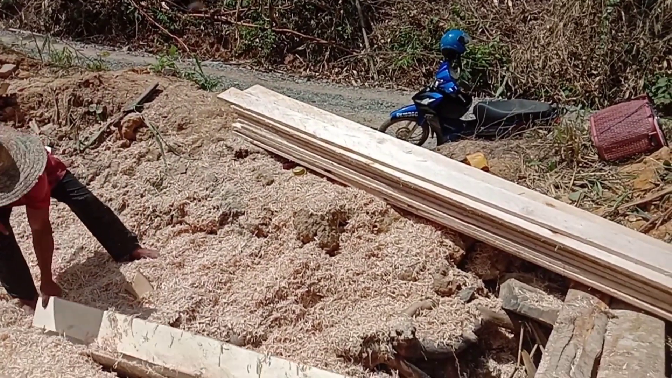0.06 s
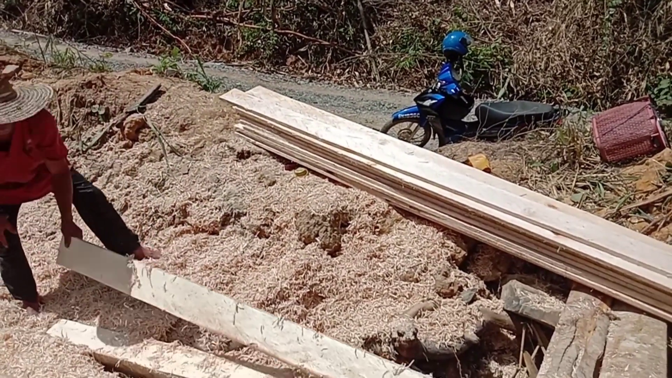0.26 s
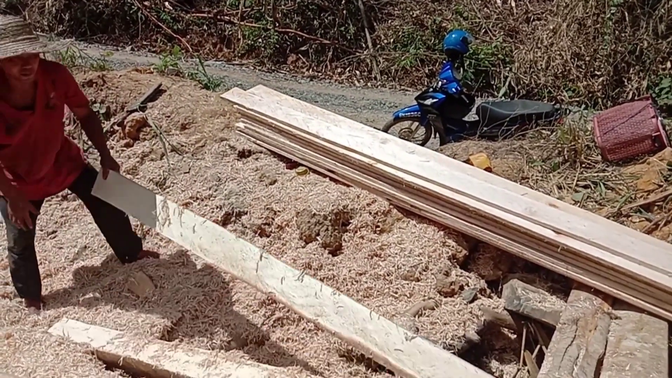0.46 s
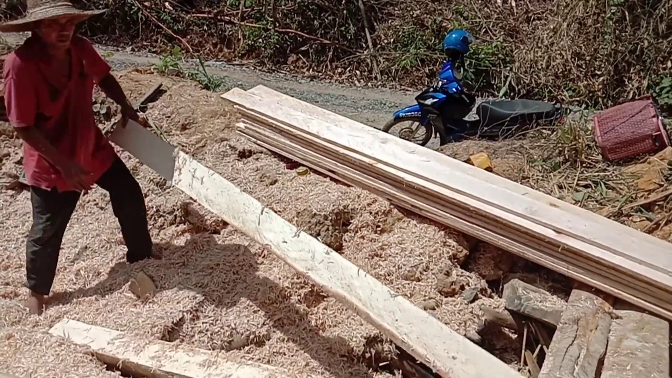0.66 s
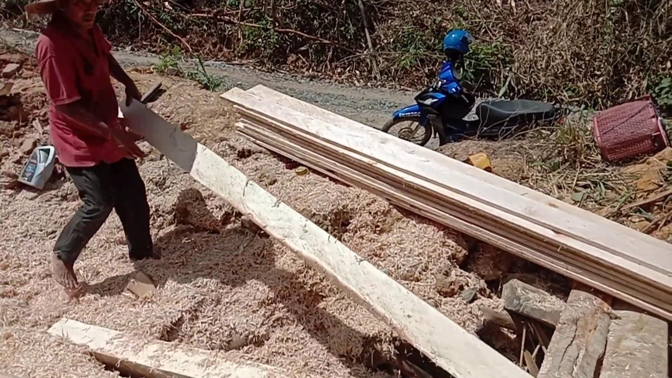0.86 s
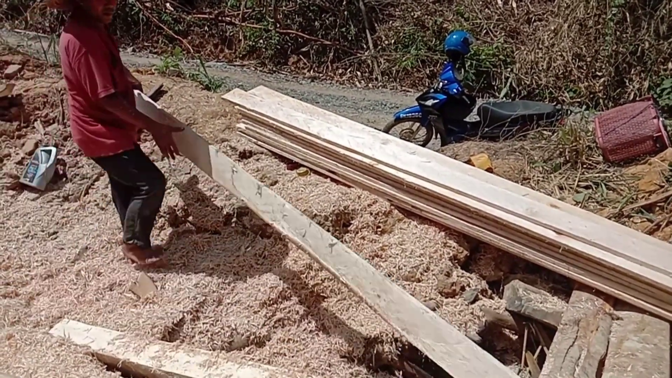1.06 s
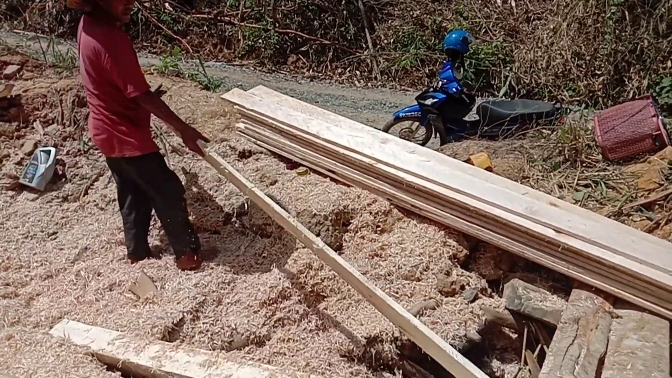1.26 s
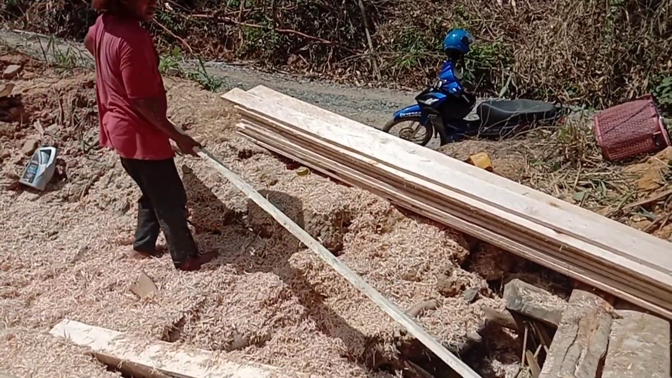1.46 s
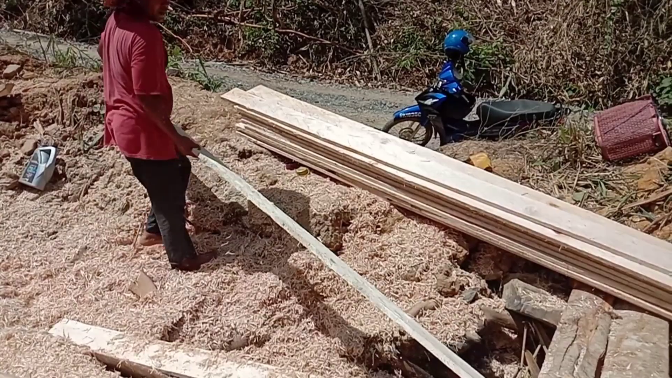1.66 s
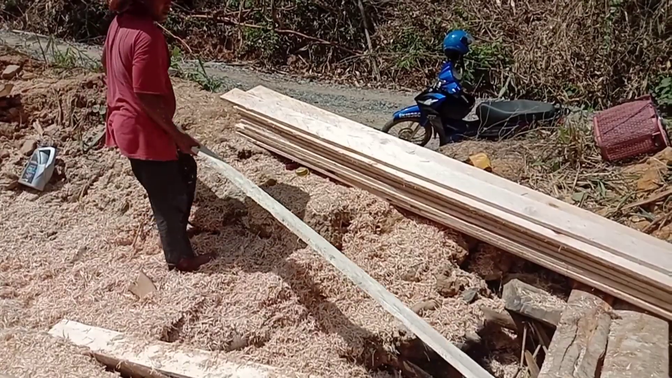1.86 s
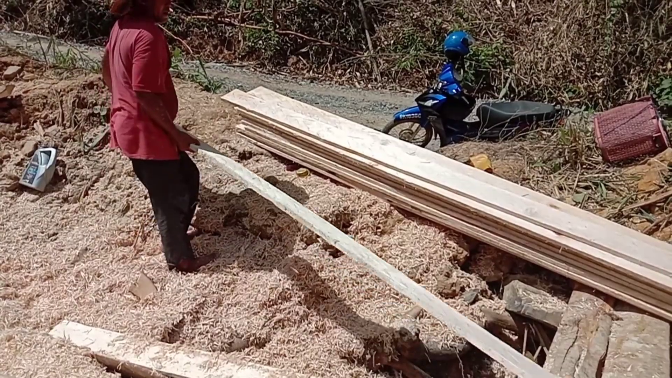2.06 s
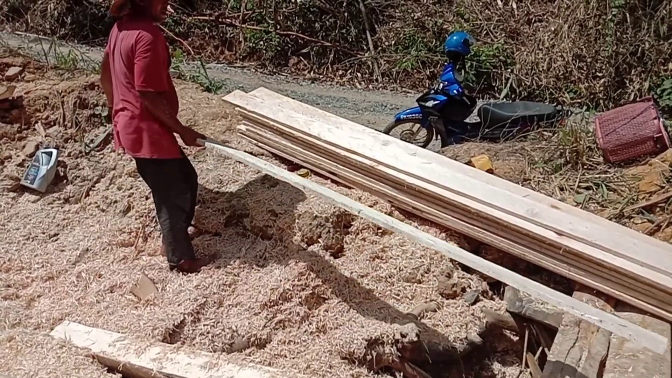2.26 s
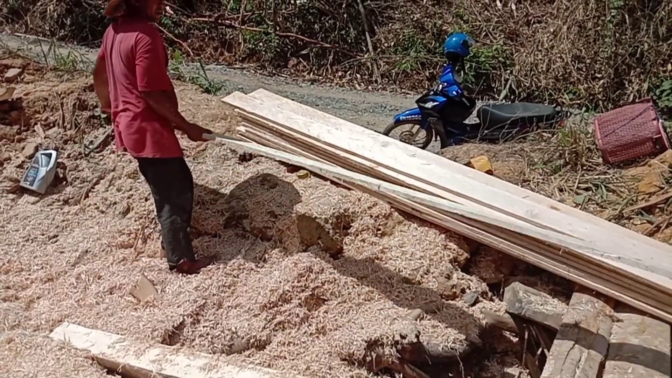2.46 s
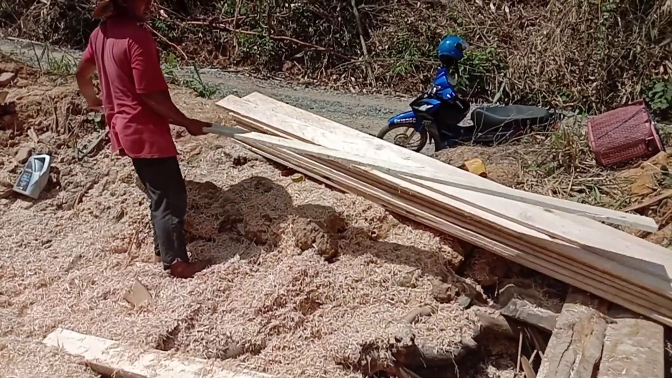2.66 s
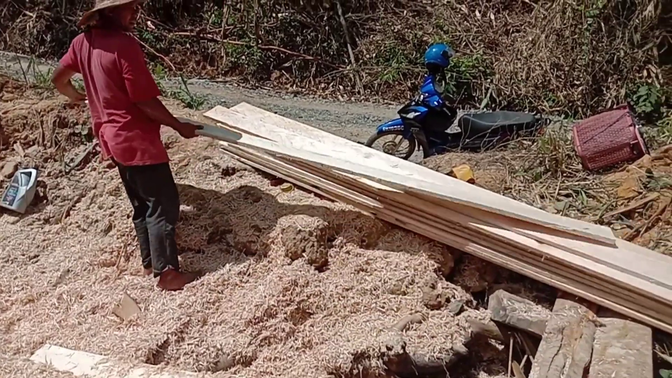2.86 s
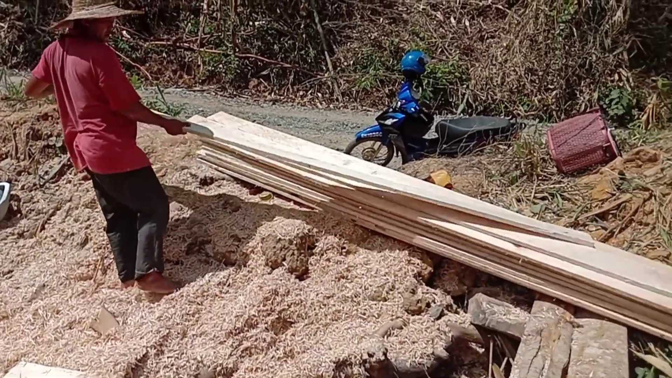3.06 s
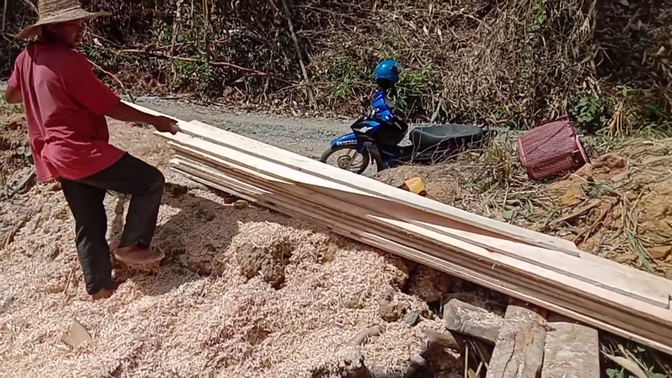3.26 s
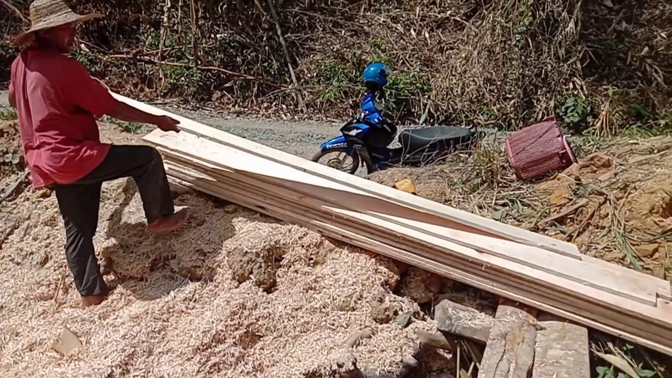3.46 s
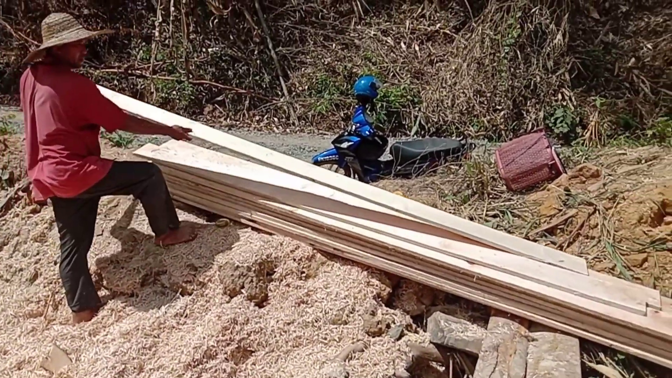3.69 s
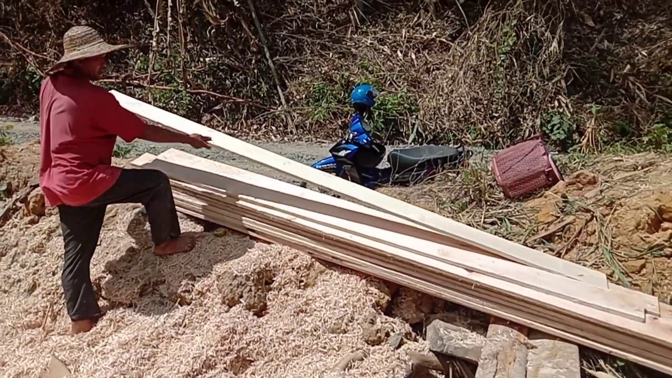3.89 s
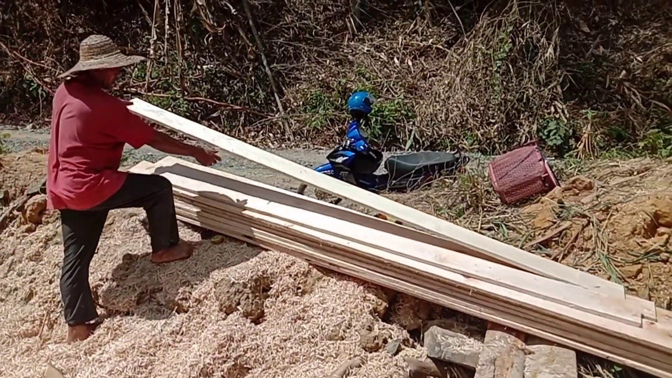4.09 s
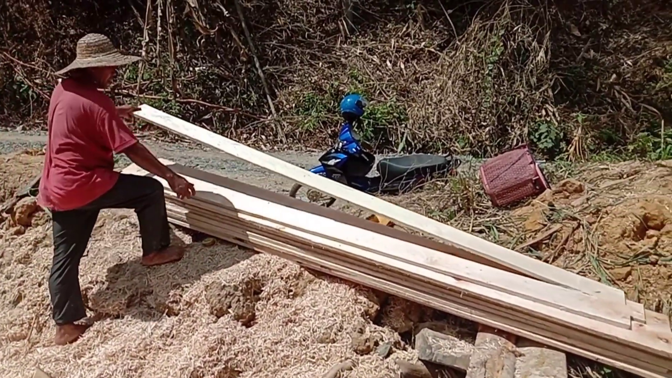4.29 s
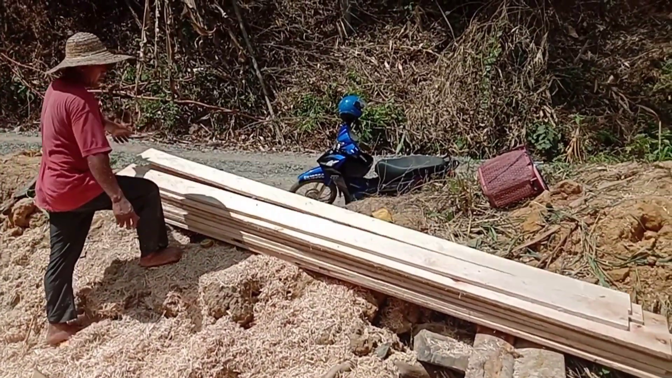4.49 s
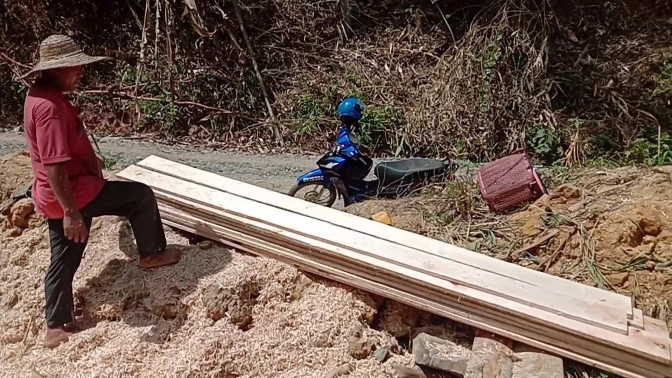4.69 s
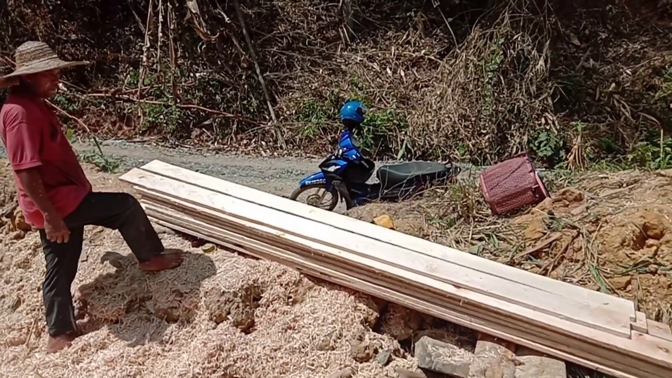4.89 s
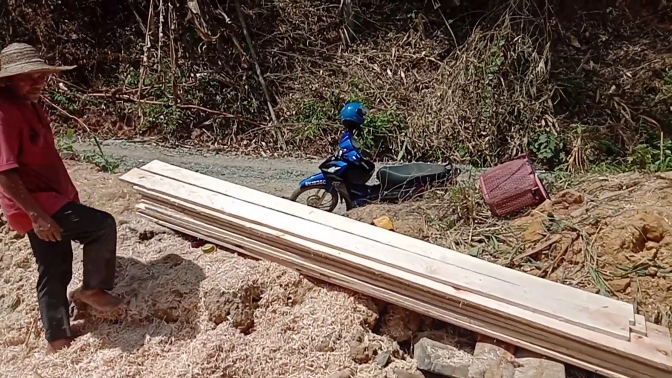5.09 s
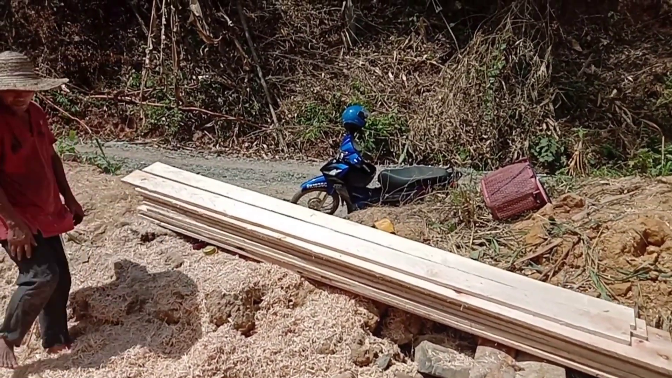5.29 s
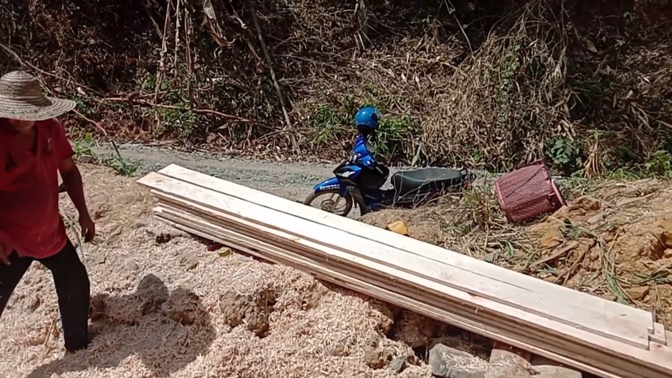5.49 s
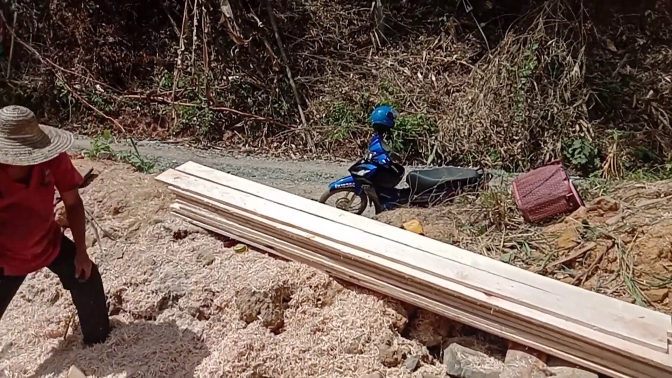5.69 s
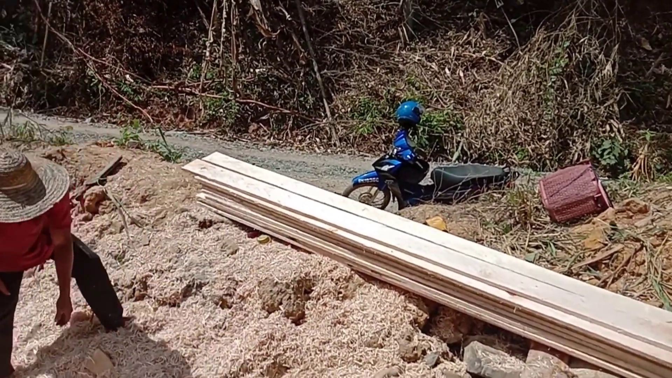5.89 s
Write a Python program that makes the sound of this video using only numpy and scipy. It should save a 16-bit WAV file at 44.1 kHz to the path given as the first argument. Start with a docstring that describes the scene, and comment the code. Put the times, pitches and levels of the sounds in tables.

```python
"""Outdoors, over steady insect noise, a low rumble and far calls, a long sawn plank is dragged off a sawdust heap:
slip grains excite rasp, judder and plank modes; shaped noise makes crunches and thuds.
Its far end lands on a stack and it slides along: struck modes, quick bounces, then finer slip grains.
Let go, it slaps down flat and clatters to rest; decaying noise is the bank's echo of the timber.
A look-ahead limiter ducks the peaks."""
import sys
import numpy as np
from scipy import signal
from scipy.fft import rfft, irfft, next_fast_len
from scipy.io import wavfile
from scipy.ndimage import uniform_filter1d, minimum_filter1d, map_coordinates

SR = 44100
rng = np.random.default_rng(int(sys.argv[2]) if len(sys.argv) > 2 else 0)


def dump(signal):
    """Clip the signal to [-1, 1] and save it as 16-bit WAV at the path in sys.argv[1]."""
    limited = np.clip(np.atleast_2d(signal).T, -1, 1)
    pcm = np.round(limited * 32767).astype(np.int16)
    wavfile.write(sys.argv[1], SR, pcm)


N = 261954


def amp(db):
    """Decibels to gain."""
    return 10 ** (np.asarray(db) / 20)


def unit(x):
    """Scale x to rms 1."""
    return x / np.sqrt(np.mean(x ** 2) + 1e-20)


def along(points, hz):
    """Interpolate (hz, value) points on a log frequency axis."""
    point_hz, value = np.transpose(points)
    return np.interp(np.log(hz + 1), np.log(point_hz + 1), value)


def pulled(rows):
    """Gain per sample from (time_s, level_db) rows, -120 dB outside them."""
    time_s, level_db = np.transpose(rows)
    return amp(np.interp(np.arange(N) / SR, time_s, level_db, left=-120, right=-120))


def steady(rows):
    """Gain per sample from (time_s, level_db) rows, held at both ends."""
    return amp(np.interp(np.arange(N) / SR, *np.transpose(rows)))


def wobble(knots_per_s):
    """Smooth random curve."""
    knots = rng.standard_normal(int(N * knots_per_s / SR) + 4)
    return map_coordinates(knots, [np.arange(N) * knots_per_s / SR], mode="nearest")


def swells(rows, rise):
    """Envelope of (start_s, level_db, length_s) pushes; a longer push rises more slowly."""
    t = np.arange(N) / SR
    envelope = np.zeros(N)
    for start_s, level_db, length_s in rows:
        age = np.maximum(t - start_s, 0) / length_s
        envelope += amp(level_db) * (1 - np.exp(-age / rise)) * np.exp(-age ** 2)
    return envelope


def humps(rows):
    """Envelope of bell-shaped (middle_s, level_db, half_width_s) swells."""
    t = np.arange(N) / SR
    return sum(amp(db) * np.exp(-((t - middle_s) / half_width_s) ** 2) for middle_s, db, half_width_s in rows)


def colour(x, gain):
    """Filter x causally (minimum phase) with the given gain of frequency."""
    size = 2 * next_fast_len(len(x) // 2 + 4096)
    log_gain = np.log(np.maximum(gain(np.fft.rfftfreq(size, 1 / SR)), 1e-6))
    cepstrum = irfft(log_gain)
    # fold the cepstrum onto positive time
    cepstrum[1:size // 2] *= 2
    cepstrum[size // 2 + 1:] = 0
    return irfft(rfft(x, size) * np.exp(rfft(cepstrum)))[:len(x)]


def shaped(x, spectrum):
    """Filter x by (hz, level_db) points, then scale to rms 1."""
    return unit(colour(x, lambda hz: amp(along(spectrum, hz))))


def patchy(x, depth_db):
    """Let slow, narrow patches of gain drift over x."""
    z = signal.stft(x, nperseg=1024)[2]
    field = uniform_filter1d(rng.standard_normal(z.shape), size=4, axis=0)
    field = uniform_filter1d(field, size=12, axis=1)
    return unit(signal.istft(z * amp(depth_db * unit(field)), nperseg=1024)[1][:N])


def grains(per_s, spread_db):
    """Tiny random impulses of uneven size and either sign."""
    hits = rng.random(N) < per_s / SR
    return unit(hits * rng.choice([-1, 1], N) * amp(spread_db * rng.standard_normal(N)))


def dying(t60s, size):
    """Noise in which each frequency decays by its own (hz, t60_s)."""
    hz, t, z = signal.stft(rng.standard_normal(size), SR, nperseg=256)
    decay = amp(-60 * t / along(t60s, hz)[:, None])
    return signal.istft(z * decay, SR, nperseg=256)[1][:size]


def ring(modes, strengths, t):
    """Sum damped sines of (hz, level_db, t60_s) modes."""
    hz, level_db, t60_s = np.transpose(modes)[:, :, None]
    return strengths @ (amp(level_db - 60 * t / t60_s) * np.sin(2 * np.pi * hz * t))


def add(track, start_s, sound):
    """Mix a sound into the track at start_s."""
    part = track[max(round(start_s * SR), 0):][:len(sound)]
    part += sound[:len(part)]


def outdoors(air_db=-65, hum_db=0, drone_hz=127, hiss_db=-75):
    """Noise bands for open air and a low rumble, a sine drone with wavering pitch, white hiss."""
    # open air noise: hz, level_db (per Hz)
    air_band = [(150, -15), (250, -8.5), (400, -9), (950, -11.5), (1250, -6.5), (1500, -10.5), (1950, -6.5),
                (2500, -9), (3100, -16), (3900, -5.5), (4600, -12), (5400, -12), (6400, -23.5), (9000, -37),
                (14000, -57)]
    # far, low rumble: time_s, level_db
    hum_level = [(0, -68), (2.1, -71.5), (3.7, -72.5), (5.94, -71)]
    # rumble spectrum: hz, level_db (per Hz)
    hum_band = [(20, -45), (45, -19), (80, -5), (128, 4), (175, -8.5), (260, -6), (500, -33.5), (1500, -62)]
    # far drone coming and going: middle_s, level_db, half_width_s
    drone_swells = [(5.11, -63.5, 0.056), (5.29, -64, 0.046), (5.88, -60.5, 0.13)]
    air = amp(air_db + 2.0 * wobble(7.8)) * patchy(shaped(rng.standard_normal(N), air_band), depth_db=3.5)
    hum = steady(hum_level) * amp(hum_db + 2.5 * wobble(3.1)) * shaped(rng.standard_normal(N), hum_band)
    tone = np.sin(2 * np.pi * np.cumsum(drone_hz * (1 + 0.044 * wobble(31))) / SR)
    drone = humps(drone_swells) * unit(tone)
    return air + hum + drone + amp(hiss_db) * rng.standard_normal(N)


def stridulation(band, pulse_hz, depth, drift):
    """Insect noise in one band, pulsing at a nearly steady rate."""
    phase = 2 * np.pi * np.cumsum(pulse_hz * (1 + drift * wobble(7.7))) / SR
    return shaped(rng.standard_normal(N) * np.exp(depth * np.cos(phase)), band)


def insects(chorus_db=-50.5, buzz_db=-65.5, lisp_db=-66.0, throb_db=0.9, flutter_db=0.72, lisp_flicker_db=2.2):
    """Pulsed noise: a throbbing shrill chorus, a buzz above it; unpulsed, flickering lisp at the top."""
    # insect spectra: hz, level_db (per Hz)
    chorus_band = [(6300, -59.5), (6800, -23.5), (7050, -9), (7400, 2), (7780, 0), (7980, -2.5),
                   (8600, -6.5), (8850, 0), (9150, -30.5), (9600, -55), (11000, -52.5)]
    buzz_band = [(7500, -69.5), (8900, -17.5), (9400, 6), (9850, 6), (10500, 5), (11000, -6.5),
                 (11700, -18), (13000, -29.5), (15000, -71)]
    lisp_band = [(11000, -71), (13200, -29.5), (14000, -11.5), (14400, 3.5), (14900, 13.5), (15600, -1),
                 (17000, -3.5)]
    # swells of the lisp: middle_s, level_db, half_width_s
    lisp_swells = [(1.38, -65.5, .06), (1.81, -64, .045), (3.08, -66.5, .04), (4.83, -66, 0.037),
                   (5.28, -67.5, .07), (5.69, -61.5, 0.048)]
    throb = throb_db * np.sin(2 * np.pi * 24 * np.arange(N) / SR + wobble(2.8))
    throb += flutter_db * wobble(30)
    shrill = stridulation(chorus_band, pulse_hz=95, depth=.15, drift=.03)
    buzz = stridulation(buzz_band, pulse_hz=109, depth=.33, drift=.004)
    lisp_gain = amp(lisp_db + lisp_flicker_db * wobble(16)) + humps(lisp_swells)
    lisp = lisp_gain * shaped(rng.standard_normal(N), lisp_band)
    return amp(chorus_db + throb) * shrill + amp(buzz_db) * buzz + lisp


def birds(blur=0.11):
    """Short far calls: gliding sines, their pitch blurred by the brush in between."""
    # calls: start_s, pitch_hz, glide_oct, level_db, length_s
    calls = [(0.0, 1910, -0.32, -60.5, .08), (1.597, 1480, -0.69, -67, 0.056),
             (1.718, 1600, -.3, -64.5, 0.13), (1.853, 1770, 0, -64, 0.041), (2.08, 1400, -.1, -66.5, 0.12),
             (2.681, 2080, -0.28, -64, 0.083), (4.17, 2700, 0, -65.5, .09),
             (5.085, 2390, -0.51, -61.5, 0.075), (5.696, 2037, -0.2, -62, 0.097)]
    out = np.zeros(N)
    for start_s, pitch_hz, glide_oct, level_db, length_s in calls:
        u = np.linspace(0, 1, int(length_s * SR))
        jitter = np.interp(u, np.linspace(0, 1, num=40), rng.standard_normal(size=40))
        pitch = pitch_hz * 2 ** (glide_oct * u) * (1 + blur * jitter)
        tone = np.sin(2 * np.pi * np.cumsum(pitch) / SR)
        add(out, start_s, 2 * amp(level_db) * np.sin(np.pi * u) * tone)
    return out


def bank(x, build_up_s=0.01):
    """Scattered echoes from slope and brush: convolution with noise that swells briefly, then fades."""
    # echo spectrum: hz, level_db
    echo_band = [(60, -22), (300, -2), (800, -13.5), (1300, -13.5), (2000, -15.5), (3200, -14), (4500, -4),
                 (6500, -18), (12000, -11)]
    # echo decay: hz, t60_s
    echo_t60 = [(150, 0.3), (700, 0.55), (1300, 0.95), (4000, 0.97), (10000, 0.19)]
    tail = dying(echo_t60, SR) * (1 - np.exp(-np.arange(SR) / SR / build_up_s))
    tail = colour(tail / np.linalg.norm(tail), lambda hz: amp(along(echo_band, hz)))
    return signal.fftconvolve(x, tail)[:N]


def heap():
    """Sawdust and splinters crushed (grains) over dull thuds of feet and timber (low noise)."""
    # crunches: start_s, level_db, length_s
    crunches = [(0.150, -47, 0.027), (0.176, -43, 0.048), (0.222, -50, 0.13), (0.6, -50, 0.06),
                (0.802, -51, 0.018), (1.29, -54, 0.12), (1.73, -54.5, 0.078), (2.752, -39, 0.04)]
    # crunch spectrum: hz, level_db (per Hz)
    sawdust_band = [(300, 2.5), (1000, -7.5), (1800, 6.5), (3300, 2), (4300, -1), (5000, 1), (6000, -5.5),
                    (6800, 4.5), (9000, -4), (13000, -28)]
    # thuds: start_s, level_db, length_s
    thuds = [(0.09, -59, 0.11), (0.165, -63, 0.029), (1.321, -45.5, 0.046), (1.365, -57, 0.085),
             (1.85, -67, 0.061), (2.56, -61.5, 0.036), (2.66, -62.5, 0.14), (2.753, -28, 0.022),
             (3.31, -55, 0.045), (3.58, -60, 0.045), (4.02, -63.5, 0.081), (4.275, -57.5, 0.059)]
    # thud spectrum: hz, level_db (per Hz)
    heap_band = [(30, -36.5), (50, -26.5), (75, -5.5), (125, 2.5), (220, -8.5), (400, -18.5), (1000, -21.5),
                 (3000, -45)]
    crunch = swells(crunches, rise=.2) * shaped(grains(per_s=1500, spread_db=4), sawdust_band)
    thud = swells(thuds, rise=.08) * shaped(rng.standard_normal(N), heap_band)
    return crunch + thud


def plank_ring(t, scatter_db=3.5):
    """Plank struck at a new spot: each bending mode gets a random strength and sign."""
    # plank bending modes: hz, level_db, t60_s
    plank_modes = [(93.7, -17, 0.091), (134.6, -3.5, 0.099), (181, -2.5, 0.18), (229.6, -4.5, 0.18),
                   (299.3, -2, 0.16), (423, -7, 0.12), (481.8, -2, 0.15), (523, -9, 0.17),
                   (567, -4.5, 0.11), (607.6, -0.5, 0.12), (641, -6, 0.15), (707, -2.5, 0.087),
                   (832, -6.5, 0.23), (940, -13.5, 0.071), (1114, -10, 0.24), (1198, -1.5, 0.1),
                   (1276, -1.5, 0.083), (1335, -13, 0.017), (1617, -14.5, 0.13), (1707, -5.5, 0.25),
                   (2082, -10.5, 0.26), (2190, -5, 0.12), (2290, -8.5, 0.095), (2775, -10, 0.27)]
    count = len(plank_modes)
    strengths = rng.choice([-1, 1], count) * amp(scatter_db * rng.standard_normal(count))
    return unit(ring(plank_modes, strengths, t))


def rubbed(per_s, spread_db, ring_db):
    """Saw marks catch and slip: the grains make a rasp and set the plank ringing."""
    # rough wood rubbed: hz, level_db (per Hz)
    rasp_band = [(260, -47), (450, -3.5), (620, -10), (950, 2), (1400, 2.5), (1600, 5), (2000, 4.5),
                 (2400, -4.5), (3500, -8.5), (4600, -18), (5800, -10.5), (6600, -24), (12000, -52)]
    slips = grains(per_s, spread_db)
    ringing = unit(signal.fftconvolve(slips, plank_ring(np.arange(SR // 4) / SR, scatter_db=3.0))[:N])
    # light slips barely move the low modes
    ringing = unit(colour(ringing, lambda hz: hz ** 2 / (hz ** 2 + 600 ** 2)))
    return unit(shaped(slips, rasp_band) + amp(ring_db) * ringing)


def rattles():
    """Loose boards chatter against each other in quick, uneven taps."""
    # rattles: start_s, level_db, length_s
    chatter = [(0.01, -58, .045), (0.603, -40, 0.054), (1.187, -55.5, 0.03), (2.855, -48, 0.077),
               (4.402, -37, 0.019), (4.53, -40.5, 0.15), (4.64, -56.5, 0.17)]
    return swells(chatter, rise=.15) * rubbed(per_s=2500, spread_db=2, ring_db=-4)


def scrapes(drag_db=-3, judder_db=-2, slide_db=-2, uneven_db=0.6, judder_db_per_drag_db=1.27):
    """Slip grains: plank dragged over rough timber, juddering when pulled hard, then slid along the stack."""
    # force of the drag: time_s, level_db
    drag_force = [(0.1, -76), (0.192, -52.5), (0.414, -52.5), (0.46, -45.5), (0.784, -38.5), (0.86, -46.5),
                  (0.948, -47.5), (1.12, -73.5)]
    # force of the slide: time_s, level_db
    slide_force = [(3.0, -60), (3.434, -63.5), (3.914, -53), (4.124, -65), (4.37, -63.5)]
    # judder spectrum: hz, level_db (per Hz)
    judder_band = [(40, -45), (80, -3), (130, -5), (200, -0.5), (290, 3), (390, -10), (600, -4.5),
                   (900, -11), (2000, -62.5)]
    pull = pulled(drag_force)
    judder = pull.max() * (pull / pull.max()) ** judder_db_per_drag_db
    drag = amp(drag_db) * pull * rubbed(per_s=1400, spread_db=3.5, ring_db=-6)
    drag += amp(judder_db) * judder * shaped(grains(per_s=700, spread_db=4.0), judder_band)
    glide = amp(slide_db) * pulled(slide_force) * rubbed(per_s=8900, spread_db=2.5, ring_db=-0.5)
    return (drag + glide) * amp(uneven_db * wobble(45))


def bounces(gap_ratio=0.96, soften_oct_per_db=0.0862, heavier_db_per_db=1.13, slap_db=3.5, scatter_db=1):
    """The springy plank rebounds ever sooner, weaker, duller and bassier; rows as the blows in knocks()."""
    # bounce runs: start_s, length_s, nominal gap_s, first_db, loss_db (a bounce), hardness_hz, bass_db
    runs = [(2.767, .052, .013, -32, 1.4, 1400, 8), (2.929, .015, .015, -38.5, 5.5, 1380, 8),
            (4.428, 0.072, .0122, -20.5, 1.7, 1750, -9.5), (4.547, .105, .0265, -37.5, 4.5, 2100, -21)]
    rows = []
    for start_s, length_s, gap_s, first_db, loss_db, hardness_hz, bass_db in runs:
        flights = gap_ratio ** np.arange(max(round(length_s / gap_s), 1))
        times_s = start_s + length_s * np.append(0, np.cumsum(flights)) / flights.sum()
        for k, time_s in enumerate(times_s):
            lost_db = k * loss_db
            level_db = first_db - lost_db + scatter_db * rng.standard_normal()
            softened_hz = hardness_hz * 2 ** (-soften_oct_per_db * lost_db)
            rows.append((time_s, level_db, softened_hz, bass_db + heavier_db_per_db * lost_db, slap_db))
    return rows


def knocks(stack_db=3, steepness=3.25, splinter_db=-25, bass_hz=380):
    """Each contact rings plank and stack; a soft contact is dull, a flat one slaps."""
    # single blows: start_s, ring_db, contact hardness_hz, bass_db, face slap_db (re ring)
    blows = [(0.7686, -42.5, 3600, -12, 22), (0.803, -46, 4500, -31, 7), (1.2495, -49.5, 497, -16, 34.5),
             (1.2609, -40, 900, -2, 14), (2.752, -22.5, 1380, 1, 12), (2.7571, -22, 1420, -6.5, -8.5),
             (2.802, -27.5, 1250, 7, -4), (2.916, -47, 700, 5, 4), (2.963, -43, 1010, 11, 24),
             (4.400, -38, 1800, -6, 4), (4.409, -25, 1200, -5, 0), (4.4163, -15, 7040, -17.5, 23.5),
             (4.4217, -19.5, 1720, -9, 22.5), (4.511, -29.5, 1110, -12.5, 13), (4.641, -43.5, 900, 12, 0),
             (4.687, -47, 700, 17, 0)]
    # face meeting face: hz, level_db, t60_s
    slap_modes = [(413, -36.5, .012), (1680, -0.5, 0.0095), (2640, -7, 0.0065), (5305, -16, 0.015)]
    # crowded modes of the stack: hz, level_db (per Hz)
    stack_band = [(30, -45.5), (60, -13), (110, -10), (280, 1), (375, -13), (500, -1), (900, 1.5),
                  (1600, -2), (2400, 3), (3400, -9), (5200, -8.5), (7000, -25), (14000, -37)]
    # stack decay: hz, t60_s
    stack_t60 = [(100, 0.12), (600, 0.11), (2000, 0.1), (8000, 0.17)]
    out, t = np.zeros(N), np.arange(SR // 3) / SR
    slap = ring(slap_modes, np.ones(len(slap_modes)), t)
    for start_s, ring_db, hardness_hz, bass_db, slap_db in blows + bounces():
        contact = lambda hz: 1 / np.sqrt(1 + (hz / hardness_hz) ** (2 * steepness))
        # firm contacts snap fibres, which adds treble
        splinters = amp(splinter_db) * min(hardness_hz / 1500, 1)
        weight = lambda hz: amp(bass_db / (1 + (hz / bass_hz) ** 2))
        wood = plank_ring(t) + amp(stack_db) * shaped(dying(stack_t60, len(t)), stack_band)
        wood = colour(wood, lambda hz: (contact(hz) + splinters) * weight(hz))
        wood /= np.std(wood[:SR // 50])  # level set over the first 20 ms
        clap = colour(slap, lambda hz: contact(hz) ** 2)  # softness dulls the slap most
        add(out, start_s, amp(ring_db) * (wood + amp(slap_db) * clap))
    return out


def scene(echo_db=-11, lowest_hz=85):
    """Timber, rattles and calls with their echo, over heap, insects and open air."""
    # air slips round a narrow plank, so it radiates little deep bass
    timber = colour(knocks(), lambda hz: hz ** 3 / np.sqrt(hz ** 6 + lowest_hz ** 6) + .01)
    near = timber + scrapes() + rattles() + birds()
    return (near + amp(echo_db) * bank(near) + heap() + insects() + outdoors())[None]


def record(dry, ceiling_db=-1, release_db_per_s=150, top_hz=15520):
    """Microphone port resonance, then a look-ahead limiter ducking peaks, then the band limit."""
    # microphone port resonance: centre_hz, width_hz, level_db
    port_hz, width_hz, port_db = (1266, 100, 8.5)
    x = colour(dry[0], lambda hz: 1 + (amp(port_db) - 1) / (1 + (2 * (hz - port_hz) / width_hz) ** 2))
    over_db = np.maximum(20 * np.log10(np.abs(x) + 1e-9) - ceiling_db, 0)
    recovery_db = release_db_per_s * np.arange(N) / SR
    duck_db = recovery_db - np.maximum.accumulate(over_db + recovery_db)
    # centred windows start each duck ahead of its peak
    duck_db = uniform_filter1d(minimum_filter1d(duck_db, size=700), size=700)
    size = next_fast_len(N + SR // 2)
    passed = np.fft.rfftfreq(size, 1 / SR) < top_hz
    return irfft(rfft(x * amp(duck_db), size) * passed, size)[None, :N]


dry = scene()
out = record(dry)
dump(out)
```